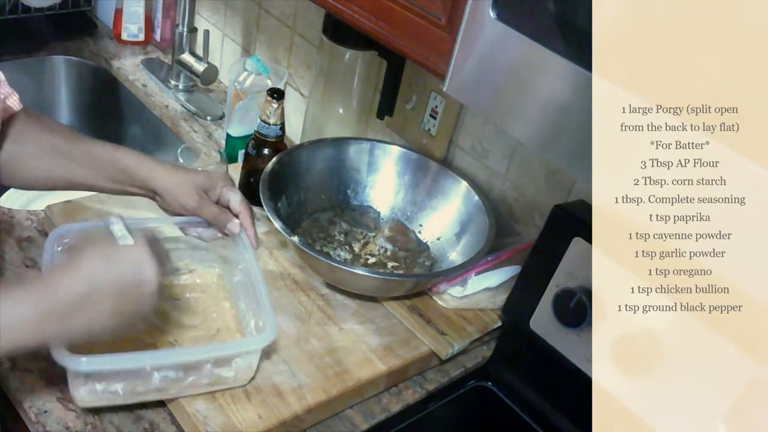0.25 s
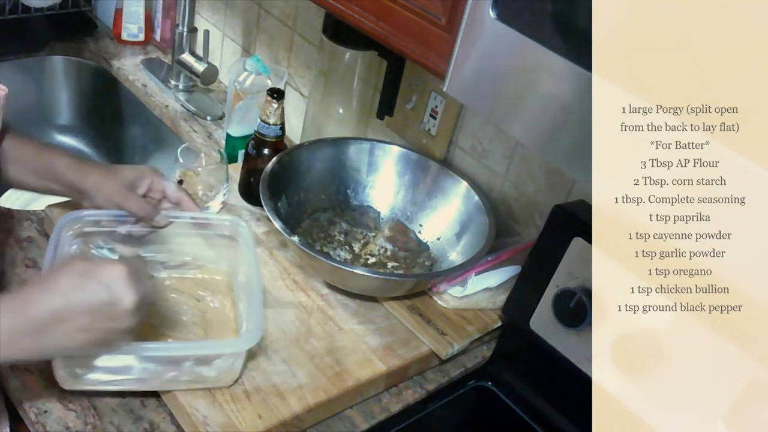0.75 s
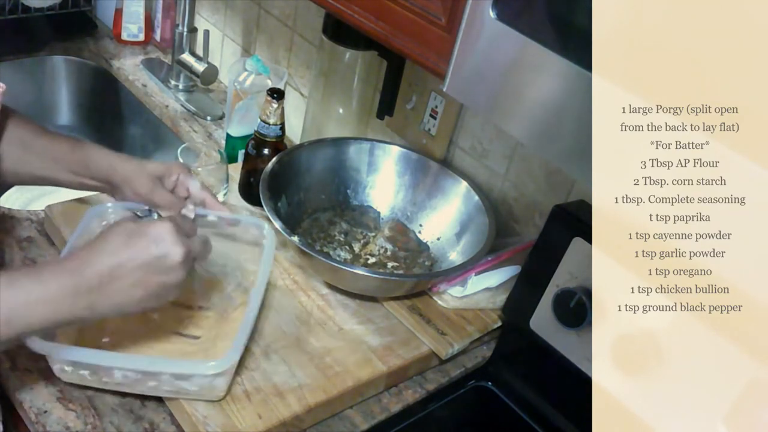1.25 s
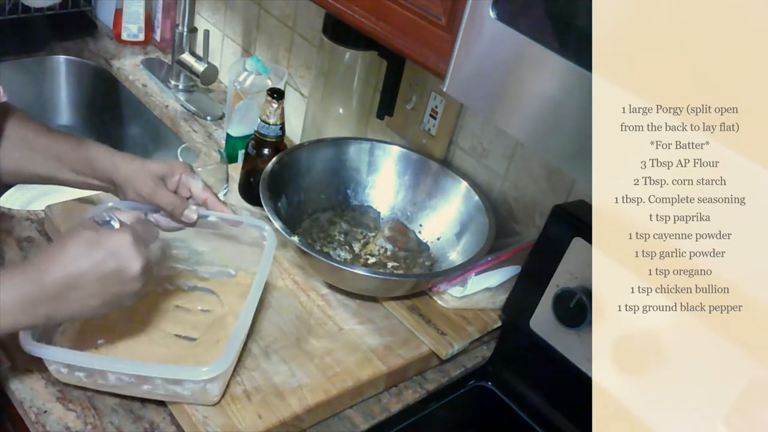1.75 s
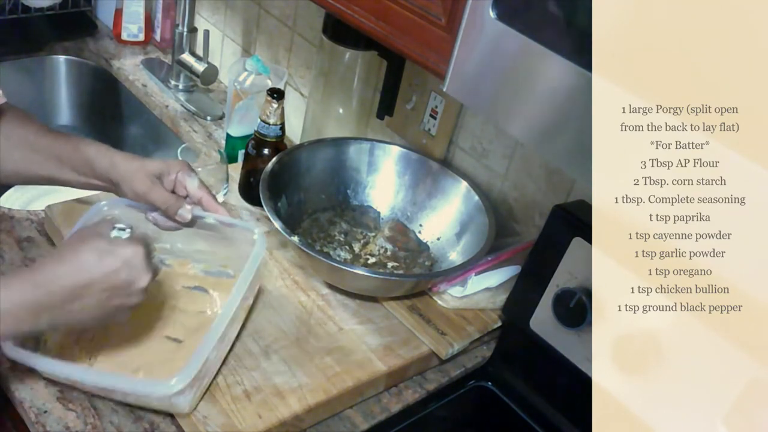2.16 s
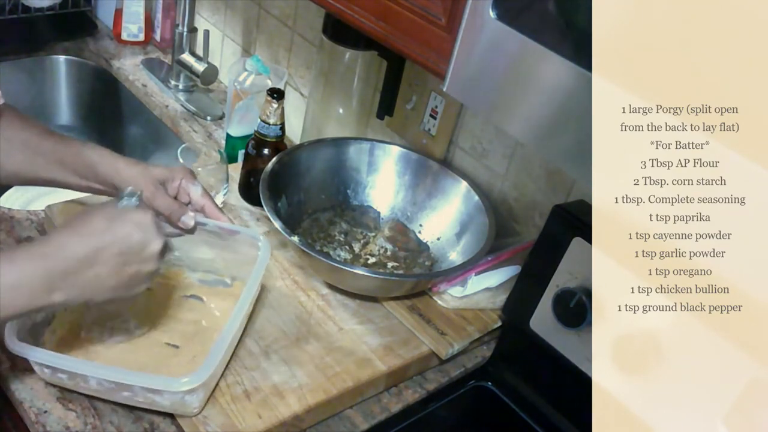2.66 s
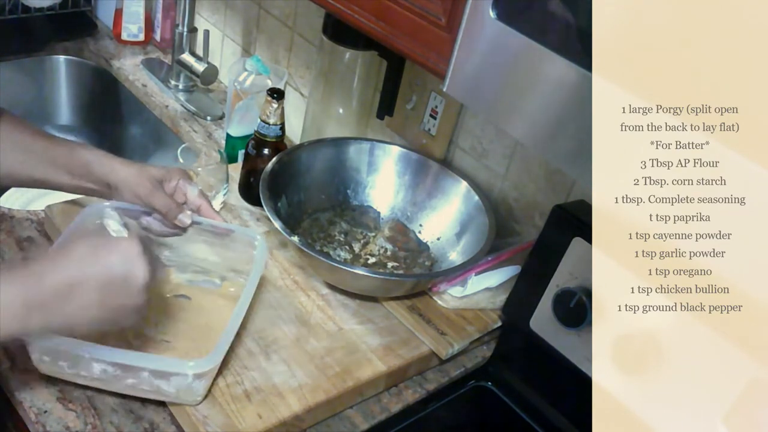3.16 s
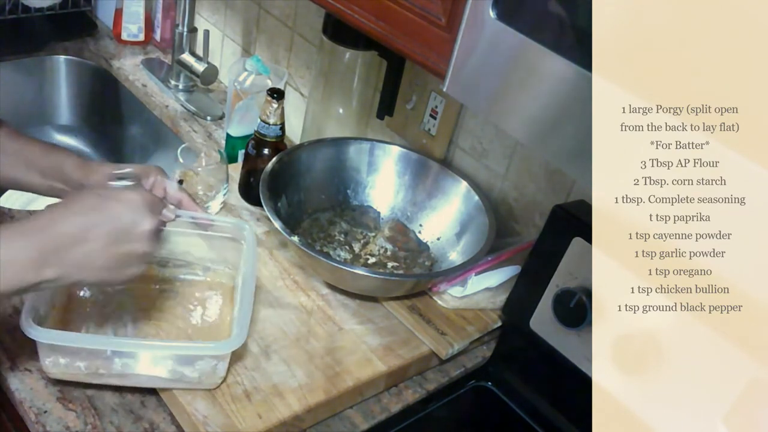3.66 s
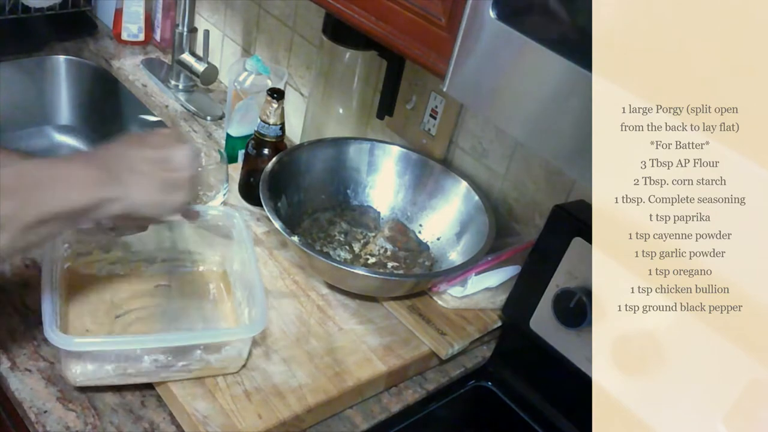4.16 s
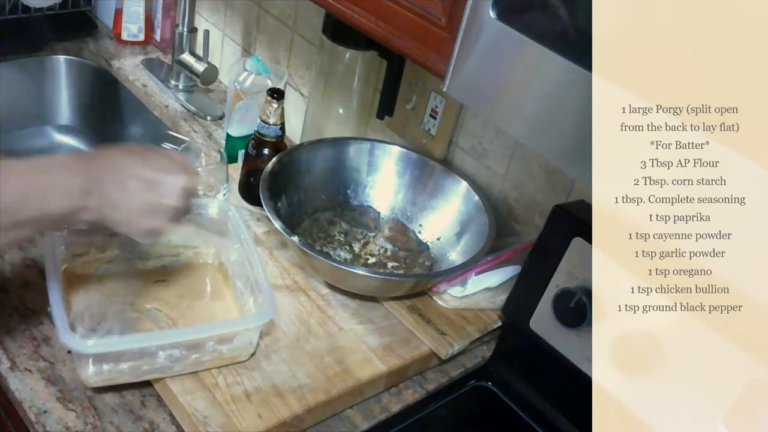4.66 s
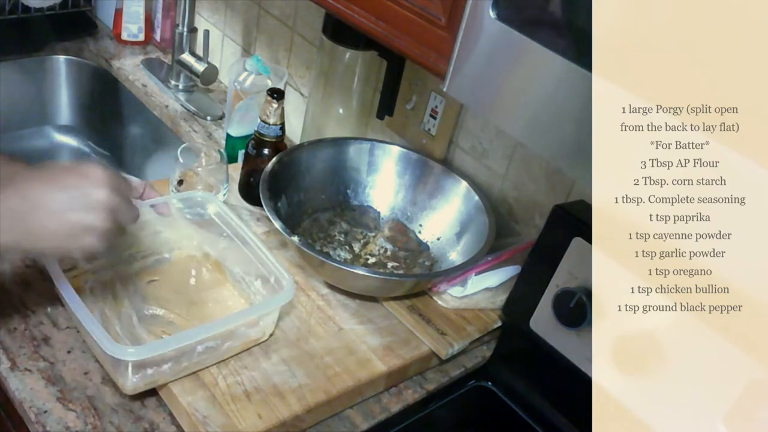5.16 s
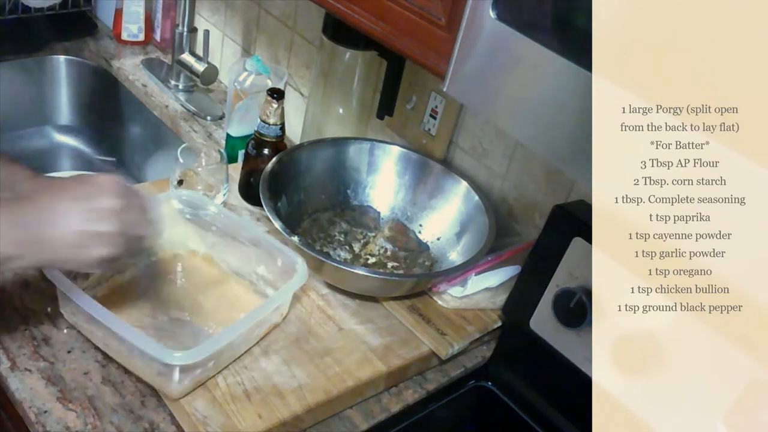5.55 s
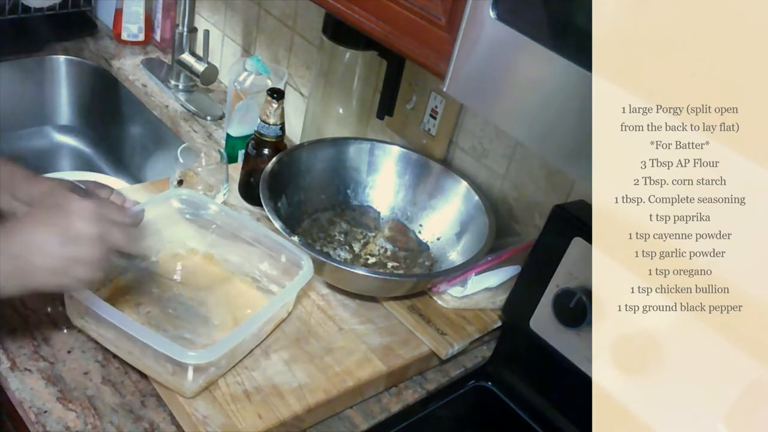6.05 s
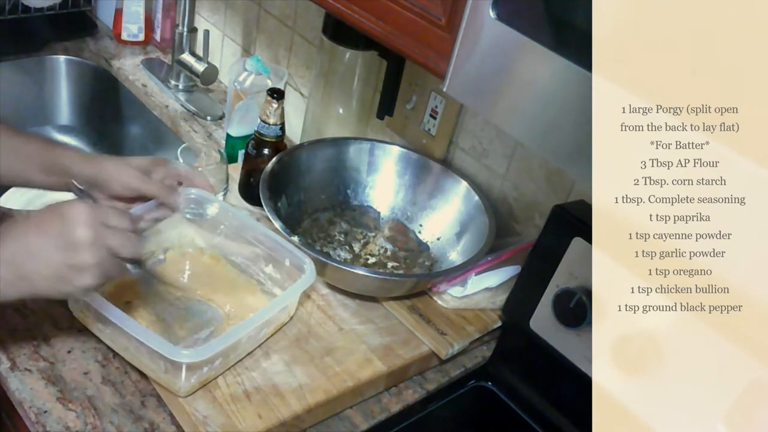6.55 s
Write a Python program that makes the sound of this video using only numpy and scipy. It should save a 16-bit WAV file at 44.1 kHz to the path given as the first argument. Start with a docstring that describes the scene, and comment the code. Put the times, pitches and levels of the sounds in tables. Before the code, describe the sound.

A wire whisk works thick batter in a plastic tub on a wooden board, close by in a small kitchen. From the start, the wires clack on the tub in uneven, hollow strokes, bunching together between about 1 and 1.5 seconds. The loudest blow by far lands at about 1.9 seconds, with further firm knocks around 2.5. Between blows the wires scrape softly, the batter squelches and small air pockets pop. From 3 to 4 seconds there are only light taps and stirring. Firmer knocks return from about 4.4 to 5.1 seconds, with deeper thuds through the board. A sharper wet smack comes near 5.7 seconds and a tiny fizzy tick near 5.9, then the taps stay soft until the end, just before 7 seconds. The sound is mono, through a small, slightly bright microphone, with a short room echo over a low, steady hush.

```python
"""A small kitchen, close to a plastic tub on a wooden board, where a wire whisk works thick batter.
The wires clack on the tub in uneven strokes that thud through the board; between blows the wires
scrape, the batter squelches and air pockets pop. Tiles and cupboards add a short tail over a quiet hush.
Heard in mono through one small, narrow-band microphone with a treble peak and one brief fizzy glitch."""
import sys
import numpy as np
from scipy import signal
from scipy.fft import rfft, irfft
from scipy.io import wavfile

SR = 44100
rng = np.random.default_rng(int(sys.argv[2]) if len(sys.argv) > 2 else 0)


def wrap_up_sound(samples):
    """Save the sound to the file named by the first command line argument, as 16-bit audio."""
    columns = np.atleast_2d(samples).T
    # keep every value between -1 and 1, then stretch to whole-number steps
    tamed = np.clip(columns, -1, 1)
    steps = np.round(tamed * 32767).astype(np.int16)
    wavfile.write(sys.argv[1], SR, steps)


N = 300401
TIME = np.arange(N) / SR


def undb(db):
    """Decibels to gain."""
    return 10 ** (np.asarray(db) / 20)


def unit(x):
    """Scale to rms 1."""
    return x / np.sqrt(np.mean(x ** 2))


def burst(x, db):
    """Scale a short sound so that its first 30 ms have this level."""
    head = x[:int(.03 * SR)]
    return x * undb(db) / np.sqrt(np.mean(head ** 2))


def decay(t, t60):
    """A fade of 60 dB every t60 seconds."""
    return np.exp(-np.log(1000) * t / t60)


def band(x, lo_hz, hi_hz, order=3):
    """Causal band-pass."""
    return signal.sosfilt(signal.butter(order, [lo_hz, hi_hz], "band", fs=SR, output="sos"), x)


def ring(x, response):
    """Pass a sound through an impulse response."""
    return signal.fftconvolve(x, response)[:len(x)]


def colour(points, size=2048):
    """Causal impulse response with a spectrum of (f/Hz, level/dB) points."""
    hz, db = np.transpose(points)
    bin_hz = np.arange(size // 2 + 1) * SR / size
    gain = undb(np.interp(np.log(bin_hz + 1), np.log(hz), db))
    cepstrum = irfft(np.log(gain))
    cepstrum[1:size // 2] *= 2
    cepstrum[size // 2 + 1:] = 0
    return irfft(np.exp(rfft(cepstrum)))


def crackle(per_s, spread_db, size):
    """Random clicks, a few much larger than the rest."""
    chance, polarity, rarity = rng.random((size, 3)).T
    strength = undb(-spread_db * np.log(np.maximum(rarity, .02)))
    return (chance < per_s / SR) * np.sign(polarity - .5) * strength


def add(out, s, x):
    """Mix a short sound in at time s."""
    start = max(int(s * SR), 0)
    out[start:start + len(x)] += x[:max(N - start, 0)]


# room tone at the microphone: f/Hz, level/dB
HUSH_SPECTRUM = [(20, -3), (60, -2.5), (120, 3.5), (300, 4), (600, -3), (1200, -9.5), (2500, -17.5),
                 (5000, -31), (8000, -34)]
def room_tone(db=-51.5):
    """The kitchen's steady, low hush."""
    return undb(db) * unit(ring(rng.standard_normal(N), colour(HUSH_SPECTRUM)))


# the kitchen's reverberation by band: low f/Hz, high f/Hz, t60/s, level/dB
REVERB_BANDS = [(70, 460, 0.45, -10.5), (410, 1440, 0.45, -8.5), (1514, 4260, 0.39, -6.5),
                (3640, 8200, 0.54, -6)]
def kitchen(x, build_s=0.0055):
    """Tiles and cupboards return a quickly building, diffuse tail behind the direct sound."""
    t = TIME[:2 * SR // 3]
    tail = np.zeros(len(t))
    for lo_hz, hi_hz, t60, db in REVERB_BANDS:
        shape = (1 - np.exp(-(t / build_s) ** 2)) * decay(t, t60)
        reflections = rng.standard_normal(len(t)) * shape / np.sqrt(np.sum(shape ** 2))
        tail += undb(db) * band(reflections, lo_hz, hi_hz)
    return x + ring(x, tail)


# resonances of the tub on its board: f/Hz, level/dB, t60/s
TUB_MODES = [(127.6, -9.5, 0.17), (171.8, -5.5, 0.13), (219, -7.5, 0.16), (275.5, -3.5, 0.18),
             (307, 6, 0.12), (363.5, -2.5, 0.21), (387, -14, 0.1), (492, -3.5, 0.18), (547, 3, 0.066),
             (606, 5.5, 0.13), (664, 1, 0.15), (766.5, -2.5, 0.097), (805, 0, 0.098), (917, -6.5, 0.08),
             (1044, -2.5, 0.14), (1117.6, 0, 0.16), (1171, -2, 0.12), (1323, -22, 0.065),
             (1450, -3.5, 0.12), (1535, -10, 0.077), (1806, -11, 0.096), (2048, -12, 0.084),
             (2174, -11, 0.046), (2350, -27.5, 0.073), (2593, -18, 0.15)]
def tub(t, scatter_db):
    """The tub's answer to one tap: its modes, weighted by a random point of contact."""
    hz, db, t60 = np.transpose(TUB_MODES)[:, :, None]
    place, detune, phase = rng.standard_normal((len(TUB_MODES), 3)).T[:, :, None]
    # the shifting batter loads the floor and detunes it a little
    swing = np.sin(2 * np.pi * (hz * (1 + 0.013 * detune) * t + phase))
    return np.sum(undb(db + scatter_db * place) * swing * decay(t, t60), axis=0)


# wet smack and fine fizz, heard close: f/Hz, level/dB
SMACK_SPECTRUM = [(300, -15), (700, 3.5), (1400, 1.5), (2100, 1), (3200, -5.5), (4500, -18.5),
                  (8000, -33.5)]
FIZZ_SPECTRUM = [(1000, -18.5), (3000, -1.5), (5000, 2), (7000, 12.5), (8000, -3)]
# the stirring hand: t/s, vigour/dB, pressure on the tub's floor/dB
STIR_EFFORT = [(0.0, -61.5, 2), (0.3, -64, -0.5), (0.89, -63.5, 3), (1.25, -60.5, 3), (1.5, -69.5, 1.5),
               (1.72, -68.5, -2), (1.99, -58.5, -1), (2.33, -73.5, 1), (2.88, -63, -2), (3.6, -68, 4),
               (4.39, -70, -1), (4.55, -64.5, 1.5), (5.19, -59.5, -2.5), (5.55, -61.5, 0),
               (5.83, -56.5, -3), (6.8, -65.5, 0.5)]
def stirring(scrape_db=11.5, smack_db=2.5, fizz_db=-8):
    """Wires drag over the tub's floor in small slips while the batter crackles around them."""
    s, vigour_db, press_db = np.transpose(STIR_EFFORT)
    vigour = undb(np.interp(TIME, s, vigour_db))
    pressure = undb(np.interp(TIME, s, press_db))
    slips = crackle(200, 7.3, N)
    scrape = undb(scrape_db) * unit(ring(slips, tub(TIME[:SR // 4], scatter_db=3.5)))
    smacks = undb(smack_db) * unit(ring(crackle(900, 3.5, N), colour(SMACK_SPECTRUM)))
    fizz = undb(fizz_db) * unit(ring(crackle(1000, 2.8, N), colour(FIZZ_SPECTRUM)))
    return vigour * (pressure * scrape + smacks + fizz)


# wet squelches and, at 5.92 s, a brief fizzy microphone glitch: t/s, level/dB, decay time/s
CLICK_CLOUDS = [(0.059, -52, 0.011), (0.141, -50, 0.015), (0.198, -42, 0.038), (0.326, -43, 0.016),
                (0.523, -35, 0.012), (0.644, -45, 0.027), (0.818, -43.5, 0.013), (0.97, -40, 0.015),
                (1.11, -46.5, 0.029), (1.254, -47, 0.0099), (1.282, -44, 0.016), (1.426, -48, 0.014),
                (1.835, -37.5, 0.014), (2.012, -33, .019), (2.36, -54.5, .017), (2.664, -53.5, 0.016),
                (2.823, -42, 0.012), (2.892, -38.5, .012), (3.397, -54, 0.035), (3.638, -54.5, 0.037),
                (4.018, -56, .013), (4.046, -51, 0.01), (4.562, -54, 0.027), (4.648, -48.5, 0.012),
                (5.045, -48.5, 0.045), (5.136, -46, .011), (5.205, -48.5, 0.013), (5.497, -49, 0.017),
                (5.651, -38, 0.0087), (5.661, -31.5, 0.0085), (5.777, -43, 0.0091), (5.917, -45.5, 0.011),
                (6.213, -46.5, .016), (6.405, -47, 0.012), (6.504, -46, .008)]
def squelches_and_glitch(attack_s=.0031, usual_db=-46, fizz_db=-60, fizz_growth=0.39):
    """Each is a short cloud of clicks, whose fizz grows more slowly than its smack."""
    out, t = np.zeros(N), TIME[:SR // 6]
    for s, db, decay_s in CLICK_CLOUDS:
        envelope = (1 - np.exp(-t / attack_s)) * np.exp(-t / decay_s)
        smack = ring(envelope * crackle(3500, 3.3, len(t)), colour(SMACK_SPECTRUM))
        fizz = ring(envelope * crackle(3400, 2.8, len(t)), colour(FIZZ_SPECTRUM))
        add(out, s, burst(smack, db - 2) + burst(fizz, fizz_db + fizz_growth * (db - usual_db)))
    return out


# dry clack of the plastic: f/Hz, level/dB
CLACK_SPECTRUM = [(60, -11.5), (140, -6.5), (600, 8), (1150, -2), (1600, -0.5), (2300, -12.5), (3200, -19),
                  (5000, -40.5), (8000, -32)]
def blow(landing_s, clack_db=-2, clack_t60=0.089):
    """The wires land one after another and ring the tub; its thin plastic clacks while they land."""
    t = TIME[:SR // 5]
    wires = 0.31 * crackle(1300, 1.95, len(t)) * np.exp(-(t / landing_s) ** 4)
    wires[0] = 1
    fade = decay(np.maximum(t - 0.83 * landing_s, 0), clack_t60)
    clack = ring(rng.standard_normal(len(t)) * fade, colour(CLACK_SPECTRUM))
    modes = ring(wires, tub(t, scatter_db=1.93))
    return burst(modes, 0) + burst(clack, clack_db)


def blow_band(hit, lo_hz, hi_hz, db, fade_in_s=.002):
    """One band of a blow at its own level; a short fade-in keeps its start free of clicks."""
    sos = signal.butter(3, [lo_hz, hi_hz], "band", fs=SR, output="sos")
    fade_in = 1 - np.exp(-(TIME[:len(hit)] / fade_in_s) ** 4)
    return burst(fade_in * signal.sosfiltfilt(sos, hit, padlen=0), db)


def board_thud(hit, db):
    """The low part of a blow, which the wooden board takes up."""
    return blow_band(hit, 95, 245, db)


# whisk on tub: t/s, level/dB, place (0 floor, 1 wall), hardness (0 coated, 1 bare wire), landing time/s
WHISK_BLOWS = [(0.108, -32.5, 0.76, 0, .009), (0.1646, -23, 0.74, 0.49, 0.013),
               (0.316, -38.5, 0.32, 0.65, .02), (0.611, -42.5, 0.45, 0.73, 0.027),
               (0.637, -38.5, .65, 0.39, 0.023), (0.79, -44.5, 0.23, 0.75, 0.012),
               (0.838, -33, 0.38, 0.69, 0.015), (0.965, -25.5, 0.3, 0.38, 0.011),
               (0.979, -25.5, 0.41, .55, .012), (1.054, -28.5, 0.63, 0.49, 0.027),
               (1.105, -41.5, 1, 0.92, 0.012), (1.276, -35.5, .15, .25, 0.025),
               (1.324, -30.5, .8, 0.52, 0.015), (1.35, -28, 0.83, 0, 0.023), (1.381, -33, 0.88, 0.72, .015),
               (1.461, -41, .7, 0.77, .017), (1.677, -32, .6, 0.65, 0.016), (1.743, -38, .25, 0.52, 0.0099),
               (1.767, -34.5, 0.46, .35, .017), (1.828, -37.5, 0.76, 0.43, 0.026),
               (1.875, -11.5, .75, .45, 0.018), (2.014, -26, 0.73, 0.84, 0.0089),
               (2.349, -46.5, .7, 0.73, 0.016), (2.507, -23, 0.52, 0.44, 0.021),
               (2.572, -26, 0.54, .45, 0.011), (2.844, -32.5, .6, 0.55, 0.025), (2.892, -38, .8, 0.8, .017),
               (3.066, -47.5, 0.79, 0.87, .025), (3.328, -48.5, .1, 0.63, 0.0059),
               (3.425, -48, 0.51, 0.92, 0.01), (3.484, -46, 0.5, 0, .019), (3.957, -37, 0.49, .6, 0.016),
               (4.14, -42, 0.5, .2, 0.0061), (4.29, -44.5, 0.73, 0.72, 0.034), (4.369, -28, 1, .55, 0.018),
               (4.688, -24.5, 0.58, 0.61, 0.012), (4.799, -38.5, 0.29, 0.18, 0.022),
               (4.867, -25, 0.86, 0.41, 0.013), (4.948, -44.5, 0.78, 0.85, 0.0071),
               (5.094, -25, 0.53, 0.32, 0.012), (5.127, -40.5, .6, 0.63, 0.0087),
               (5.339, -35, 0.31, 0.69, 0.02), (5.57, -33.5, 0.4, 0.42, 0.023),
               (5.604, -39, 0.75, .05, 0.017), (5.807, -36.5, 0, 0.52, 0.0084),
               (5.999, -44.5, 0.35, 0.81, 0.016), (6.078, -43.5, .2, 0.97, 0.018),
               (6.219, -47.5, 0, .8, 0.0054), (6.269, -48.5, 0.19, 0.29, 0.0065),
               (6.411, -40, 0.34, 0.99, 0.018), (6.704, -50.5, 0, 0.52, 0.0099)]
def knocks(lead_s=0.0021, firm_db=-31, board_give=.2):
    """Blows on the floor sound the tub's hollow, those on the wall clack higher; bare wires crack."""
    out = np.zeros(N)
    for s, db, place, hardness, landing_s in WHISK_BLOWS:
        hit = np.pad(blow(landing_s), (int(lead_s * SR), 0))
        board = board_thud(hit, db - 12 - board_give * (db - firm_db))
        hollow = blow_band(hit, 237, 429.6, db + 3 - 10.5 * place)
        floor = blow_band(hit, 462, 837, db - 0.28)
        wall = blow_band(hit, 794, 1400, db - 22 + 24.5 * place)
        crack = blow_band(hit, 1470, 7770, db - 29 + 28.5 * hardness)
        knock = np.pad(board + hollow + floor + wall + crack, (0, SR // 2))
        # the tub slides about, so every blow meets the room from a new place
        add(out, s - lead_s, kitchen(knock))
    return out


# a further board thud under some whisk blows, in the same low band: t/s, level/dB
EXTRA_THUDS = [(0.79, -46), (1.677, -30.5), (3.958, -39), (4.368, -31.5), (4.688, -31), (5.094, -34),
               (5.339, -45.5)]
def extra_thuds():
    """Under some whisk blows the board gives a further, stronger thud that carries into the room."""
    out = np.zeros(N)
    for s, db in EXTRA_THUDS:
        thud = board_thud(blow(landing_s=0.018), db)
        add(out, s, kitchen(np.pad(thud, (0, SR // 2))))
    return out


def air_pockets(per_s=3, low_hz=550, high_hz=3297, open_s=0.023, rise=0.07, t60=0.025):
    """Air pockets open at random; each rings, fed by the tearing batter, and rises in pitch."""
    out, t = np.zeros(N), TIME[:SR // 6]
    stir_s, vigour_db, _ = np.transpose(STIR_EFFORT)
    age = t / open_s
    for k in range(int(per_s * N / SR)):
        when, smallness = rng.random(2)
        s = (k + when) / per_s
        hz = low_hz * (high_hz / low_hz) ** smallness
        db = np.interp(s, stir_s, vigour_db) + rng.normal(11, 2)
        tearing = crackle(1700, 1.9, len(t)) * np.exp(-age ** 2)
        click_phases = np.exp(2j * np.pi * rng.random(len(t)))
        swell = ring(tearing * click_phases, decay(t, t60))
        phase = 2 * np.pi * np.cumsum(hz * (1 + rise * (np.tanh(age) - .5))) / SR
        add(out, s, burst(np.real(swell * np.exp(1j * phase)), db))
    return out


def scene():
    """The whisking and its kitchen as they reach the microphone."""
    hush = room_tone()
    impacts = band(knocks() + extra_thuds(), 75, 12000)  # cut the rumble below 75 Hz from the knocks
    small_sounds = kitchen(squelches_and_glitch() + stirring() + air_pockets())
    return (impacts + small_sounds + hush)[None]


def record(dry):
    """The small microphone has a treble peak, rounds off the hardest blow and cuts the highest treble."""
    ceiling, top_hz = .96, 7550
    bright = dry + undb(7.5) * band(dry, 6860, 7670, order=1)
    rounded = bright / (1 + (bright / ceiling) ** 6) ** (1 / 6)
    return signal.sosfiltfilt(signal.cheby1(9, .05, top_hz, fs=SR, output="sos"), rounded)


dry = scene()
out = record(dry)
wrap_up_sound(out)
```